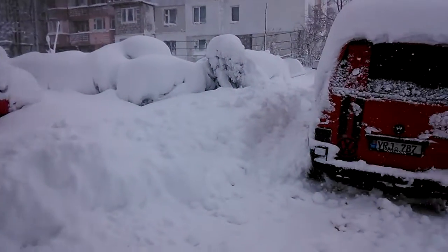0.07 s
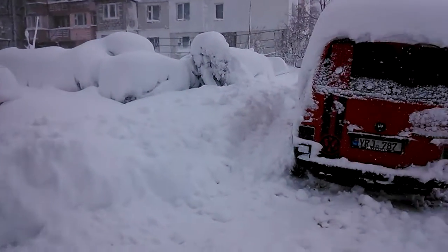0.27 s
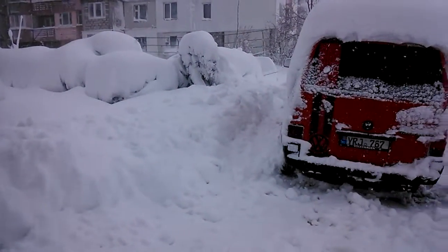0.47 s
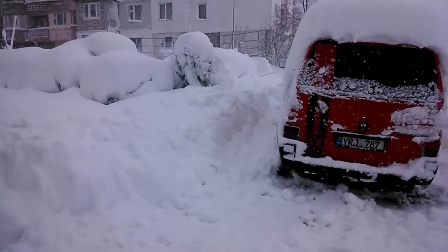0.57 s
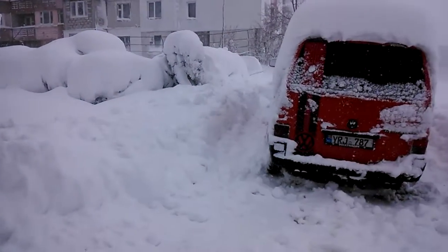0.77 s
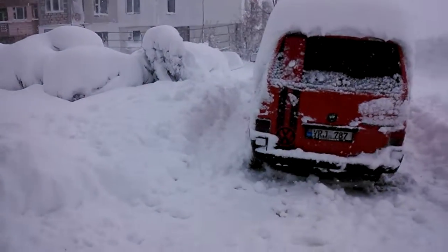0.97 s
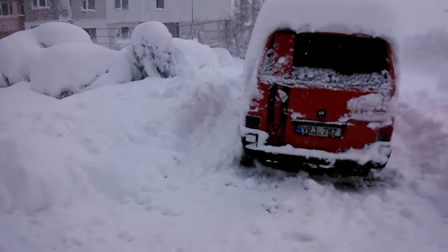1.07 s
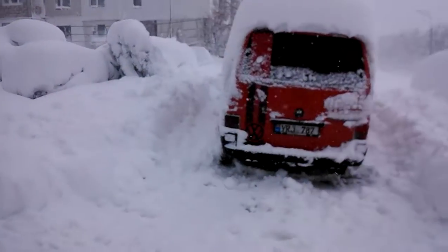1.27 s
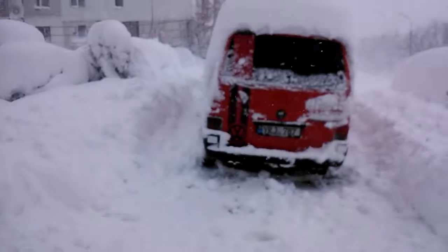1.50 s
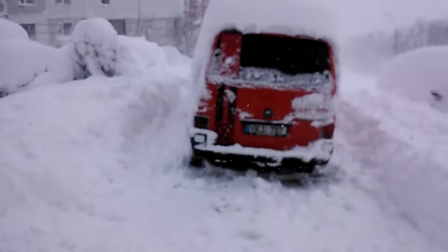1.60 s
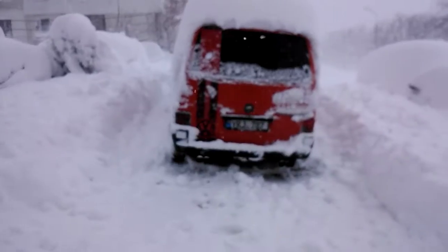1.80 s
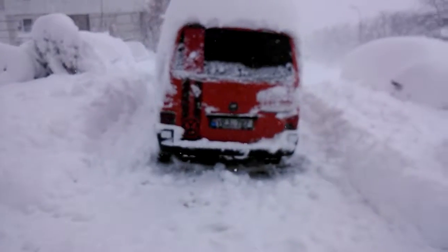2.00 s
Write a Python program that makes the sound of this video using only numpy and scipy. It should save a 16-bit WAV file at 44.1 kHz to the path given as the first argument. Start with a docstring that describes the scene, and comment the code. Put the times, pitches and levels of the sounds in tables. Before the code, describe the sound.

Gusty wind rumbles on the microphone outdoors in the snow. It rises after a soft handling rustle, thumps a few times under a faint hiss, then fades, with a few more light rustles and one last short puff.

```python
"""In a snowed-in street, wind buffets a hand-held microphone and then dies down.
Turbulent pressure at the port makes the sound: large eddies give a lumpy rumble, small ones a flutter,
and single eddies a few hard thumps. Above lie a rush of air and a thin hiss; the signal's highs cut out
briefly near one second. Handling friction excites the casing in soft rustles, at the start and in the
second half. One faint far tone sounds briefly."""
import sys
import numpy as np
from scipy import signal
from scipy.fft import rfft, irfft
from scipy.io import wavfile
from scipy.ndimage import uniform_filter1d

SR = 44100
rng = np.random.default_rng(int(sys.argv[2]) if len(sys.argv) > 2 else 0)


def dump_mix(stems):
    """Bounce the given channels to the path in sys.argv[1] as a 16-bit WAV at rate SR."""
    frames = np.atleast_2d(stems).T  # one column per channel
    limited = np.clip(frames, -1, 1)  # hard clip at full scale
    pcm = np.round(limited * 32767).astype(np.int16)
    wavfile.write(sys.argv[1], SR, pcm)


N = 90404
T = np.arange(N) / SR
BIN_HZ = np.arange(N // 2 + 1) * SR / N


def from_db(db):
    """Amplitude ratio of a level: a factor of ten for every 20 dB."""
    return 10 ** (np.asarray(db) / 20)


def unit_rms(x):
    """Normalisation to a mean square of one."""
    return x / np.sqrt(np.mean(x ** 2) + 1e-20)


def in_time(rows):
    """Linear interpolation of (time, value) rows at every sample."""
    return np.interp(T, *np.transpose(rows))


def drift(rate_hz):
    """Random modulation of unit rms: white noise smoothed by a double pole at rate_hz."""
    stride, settling = 40, 2000  # samples per step; steps for the filter to settle
    pole = np.exp(-2 * np.pi * stride * rate_hz / SR)
    white = rng.standard_normal(N // stride + settling + 2)
    slow = signal.lfilter([1], [1, -2 * pole, pole * pole], white)[settling:]
    return np.interp(np.arange(N) / stride, np.arange(len(slow)), unit_rms(slow))


def noise(spectrum):
    """Spectral shaping: white noise weighted by relative levels, then scaled to unit rms."""
    hz, db = np.transpose(spectrum)
    gain = from_db(np.interp(np.log(np.maximum(BIN_HZ, 1)), np.log(hz), db, left=-90, right=-90))
    return unit_rms(irfft(rfft(rng.standard_normal(N)) * gain, N))


def evened(x, span_s):
    """Division by the running rms removes the slow level swings of a noise."""
    size = max(int(span_s * SR), 2)
    power = uniform_filter1d(uniform_filter1d(x ** 2, size), size)
    return x / np.sqrt(np.maximum(power, 1e-9))


def resonance(x, hz, width_hz):
    """A damped mode: a two-pole resonator with unit gain at its peak."""
    radius = np.exp(-np.pi * width_hz / SR)
    gain = (1 - radius ** 2) / 2
    feedback = [1, -2 * radius * np.cos(2 * np.pi * hz / SR), radius ** 2]
    return signal.lfilter([gain, 0, -gain], feedback, x)


def wind_rumble():
    """Turbulence: large eddies pass the port slowly, so their pressure fluctuates at low frequencies."""
    # strength of the wind on the port: (time [s], level [dB])
    gust = [(0, -51.5), (.08, -50), (.145, -37.5), (.18, -52), (.215, -33), (.315, -26.5), (.365, -48.5),
            (.43, -28.5), (.5, -34), (.59, -31), (.642, -51), (.67, -27.5), (.705, -29.5), (.755, -24),
            (.79, -30.5), (.835, -56), (.865, -27), (.89, -41), (.925, -23), (.965, -33), (1.09, -27),
            (1.175, -35.5), (1.2, -28.5), (1.25, -25), (1.345, -48), (1.395, -32.5), (1.44, -51.5),
            (1.48, -78), (1.58, -60), (1.635, -72), (1.652, -31.5), (1.685, -39.5), (1.72, -67),
            (1.84, -78), (1.885, -59), (1.96, -73), (2.05, -73)]
    # spectrum of the large eddies: (frequency [Hz], relative level [dB])
    spectrum = [(25, -16), (34, -23), (42, -2.5), (54, 6), (85, -1.5), (120, -7.5), (170, -25.5),
                (260, -39.5), (500, -63)]
    return from_db(in_time(gust)) * evened(noise(spectrum), span_s=0.043)


def wind_flutter():
    """Turbulent intermittency: small eddies pass quickly and flutter in bursts above the rumble."""
    # envelope of the flutter: (time [s], level [dB])
    levels = [(0, -54), (.1, -54), (.15, -42.5), (.19, -59.5), (.26, -40), (.32, -45.5), (.37, -47.5),
              (.43, -38), (.47, -41), (.58, -41), (.645, -54), (.69, -40.5), (.75, -48.5), (.78, -47),
              (.825, -50), (.9, -37.5), (.96, -40.5), (1.08, -43), (1.16, -50), (1.21, -43.5), (1.29, -52),
              (1.35, -47.5), (1.43, -57.5), (1.49, -66.5), (1.57, -67.5), (1.63, -67), (1.66, -50.5),
              (1.73, -61.5), (1.84, -82.5), (1.88, -53.5), (1.97, -68.5), (2, -56.5), (2.05, -72)]
    # spectrum of the small eddies: (frequency [Hz], relative level [dB])
    spectrum = [(60, -22.5), (110, 0.5), (165, 7), (230, -7), (340, -13.5), (450, -28), (700, -43.5),
                (1200, -66)]
    bursts_db = 2 * drift(rate_hz=58)
    return from_db(in_time(levels) + bursts_db) * evened(noise(spectrum), span_s=0.013)


def rush_and_hiss():
    """Amplitude modulation makes three noise bands grainy; the signal's treble cuts out at moments."""
    # rush, treble and high hiss, including the signal's brief dropouts: (time [s], level [dB])
    rush_levels = [(0, -59), (.15, -56.5), (.19, -62), (.27, -59.5), (.35, -61.5), (.44, -56.5), (.5, -65),
                   (.59, -58), (.64, -65.5), (.7, -54.5), (.78, -61), (.83, -55), (.94, -59.5), (1, -93),
                   (1.05, -62), (1.13, -64.5), (1.19, -60), (1.35, -66), (1.42, -60.5), (1.5, -76),
                   (1.58, -70), (1.635, -75), (1.655, -57.5), (1.7, -56.5), (1.74, -71.5), (1.83, -78.5),
                   (1.92, -68.5), (2.05, -79.5)]
    treble_levels = [(0, -78), (.2, -59), (.48, -80.5), (.6, -59.5), (.72, -93), (.84, -62), (.95, -63.5),
                     (.99, -116), (1.08, -96), (1.17, -63.5), (1.26, -70), (1.3, -61.5), (1.35, -67),
                     (1.42, -63.5), (1.5, -78), (1.635, -76.5), (1.655, -61.5), (1.685, -61.5), (1.72, -66),
                     (1.78, -79.5), (1.85, -82.5), (1.89, -76), (2.05, -82.5)]
    hiss_levels = [(0, -58), (.15, -55.5), (.185, -62), (.22, -53), (.44, -54), (.5, -57.5), (.6, -54),
                   (.645, -59.5), (.71, -56), (.79, -57), (.92, -54.5), (.96, -61), (.985, -120),
                   (1.1, -116), (1.19, -67.5), (1.3, -70), (1.35, -80), (1.42, -84), (1.5, -99), (1.6, -99),
                   (1.84, -100), (2.05, -80.5)]
    # their spectra: (frequency [Hz], relative level [dB])
    rush_spectrum = [(200, 6), (350, 3), (520, -0.5), (720, 4), (900, 1), (1200, -3.5), (1700, -6),
                     (2200, -3), (2700, -13), (3800, -24), (5200, -37), (9000, -68)]
    treble_spectrum = [(1500, -6), (2500, 4), (3600, 1.5), (5000, -0.5), (7000, -2.5), (10000, 3),
                       (16000, -8)]
    hiss_spectrum = [(2500, -32), (5000, -28.5), (6200, -5), (7500, 7.5), (9300, 10.5), (10500, 9.5),
                     (12000, 3.5), (16000, 4.5)]
    rush = from_db(in_time(rush_levels) + 2.1 * drift(60)) * noise(rush_spectrum)
    treble = from_db(in_time(treble_levels) + 1.5 * drift(100)) * noise(treble_spectrum)
    hiss = from_db(in_time(hiss_levels) + 1.5 * drift(140) + drift(20)) * noise(hiss_spectrum)
    return rush + treble + hiss


def handling_rustles():
    """Forced vibration: friction drives the casing's modes; each rub has its own level and brightness."""
    # rubs of the hand: (end of attack [s], hold [s], level [dB], tilt above 500 Hz [dB/octave])
    rubs = [(.0, 0.069, -51, 1.6), (0.091, 0.059, -52.5, -0.2), (.89, 0.035, -65, -8),
            (1.17, 0.044, -64, -3), (1.285, 0.023, -68.5, -9), (1.402, 0.049, -66, 1.5),
            (1.653, 0.044, -59, -1.2), (1.884, 0.016, -69, 2)]
    # modes of the casing: (frequency [Hz], bandwidth [Hz], relative level [dB])
    modes = [(834, 380, -5.5), (1750, 208, 4.5), (2094, 310, 2), (2960, 110, -4.5), (3540, 310, -4.5),
             (9700, 2000, -21.5)]
    attack_s, release_s = 0.018, 0.016
    out = np.zeros(N)
    for time_s, hold_s, db, tilt_db in rubs:
        friction = rng.standard_normal(N) * from_db(0.71 * drift(170))
        casing = sum((-1) ** k * from_db(mode_db) * resonance(friction, hz, width_hz)
                     for k, (hz, width_hz, mode_db) in enumerate(modes))
        tilt = from_db(tilt_db * np.log2(np.maximum(BIN_HZ, 500)))
        rustle = unit_rms(irfft(rfft(casing) * tilt, N))
        attack = np.clip((T - time_s) / attack_s + 1, 0, 1) ** 2
        release = np.exp(-np.maximum(T - time_s - hold_s, 0) / release_s)
        out += from_db(db) * attack * release * rustle
    return out


def eddy_thumps():
    """A vortex has a low-pressure core: each gives a sharp suction with a swell on either side."""
    # single eddies hitting the port: (time [s], peak level [dB], time scale [s])
    eddies = [(0.438, -16, 0.0049), (0.446, -18.5, 0.0028), (0.48, -27, 0.002), (0.492, -13, 0.0043),
              (0.528, -22, 0.0041), (.983, -13, 0.0058), (.994, -9.5, 0.003)]
    pressure = np.zeros(N)
    for time_s, db, scale_s in eddies:
        offset = (T - time_s) / scale_s
        pressure -= from_db(db) * (1 - 3 * offset ** 2) / (1 + offset ** 2) ** 3
    return pressure


def far_tone():
    """Frequency modulation: three faint partials waver together under a half-sine envelope."""
    # partials of the tone: (frequency [Hz], level [dB])
    partials = [(705, -52.5), (1185, -63), (1400, -64)]
    start_s, length_s, waver = 0.655, 0.11, 0.012  # waver: rms fraction of the frequency
    envelope = np.sin(np.pi * np.clip((T - start_s) / length_s, 0, 1))
    phase_per_hz = 2 * np.pi * np.cumsum(1 + waver * drift(47)) / SR
    return envelope * sum(from_db(db) * np.sin(hz * phase_per_hz) for hz, db in partials)


def scene():
    """Superposition: all the sources add at one microphone."""
    wind = wind_rumble() + wind_flutter()
    return (wind + rush_and_hiss() + handling_rustles() + eddy_thumps() + far_tone())[None]


def record(dry):
    """Band limiting: the microphone loses the deepest bass, and the top is cut steeply."""
    low_cut_hz, high_cut_hz = 34, 15900
    high_pass = signal.butter(4, low_cut_hz, "high", fs=SR, output="sos")
    low_pass = signal.ellip(12, 0.1, 80, high_cut_hz, fs=SR, output="sos")
    return signal.sosfilt(low_pass, signal.sosfilt(high_pass, dry))


dry = scene()
out = record(dry)
dump_mix(out)
```